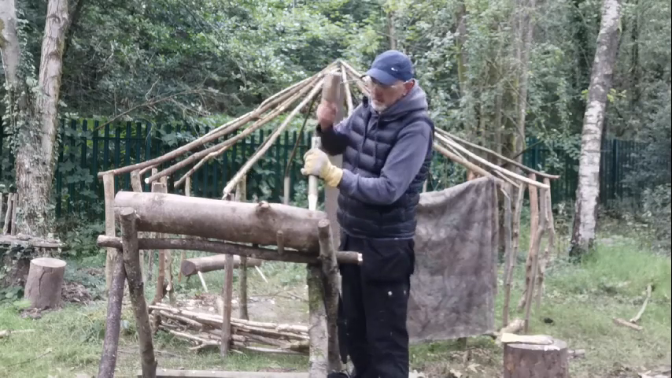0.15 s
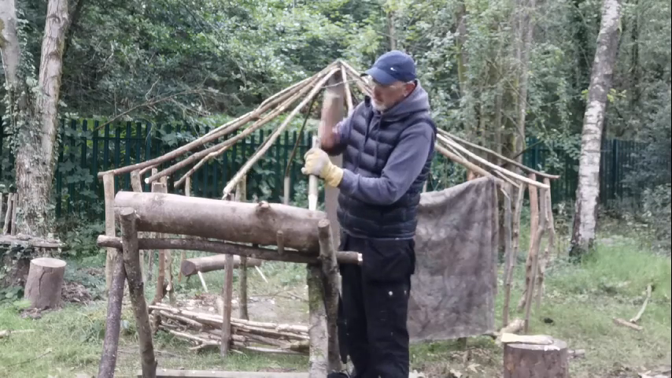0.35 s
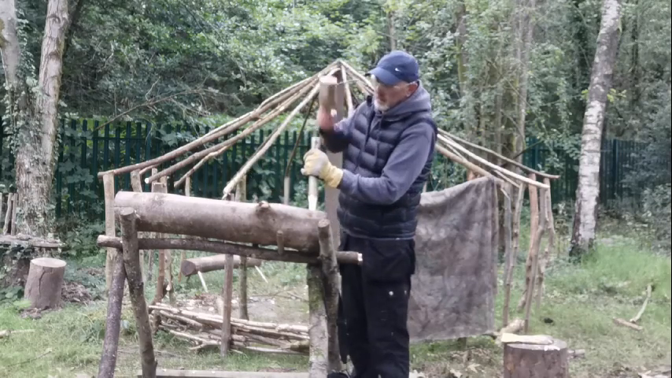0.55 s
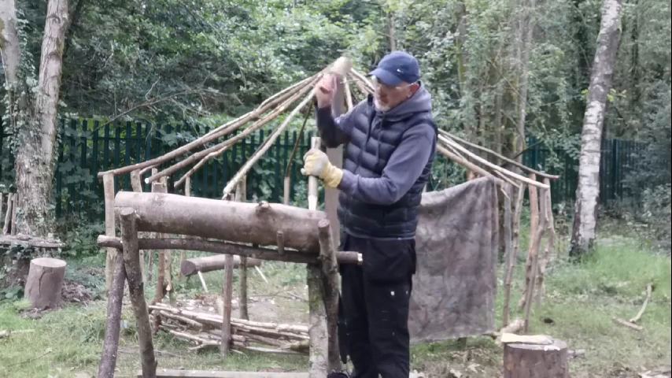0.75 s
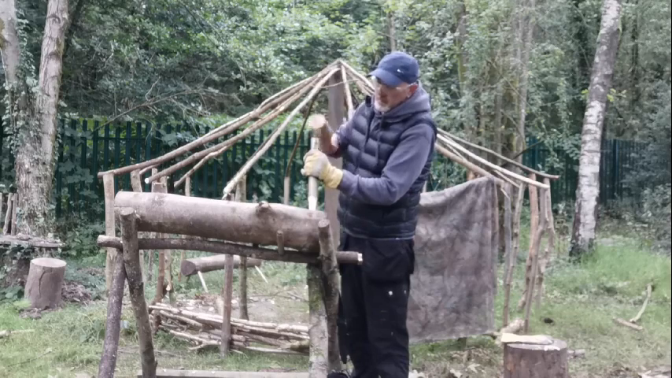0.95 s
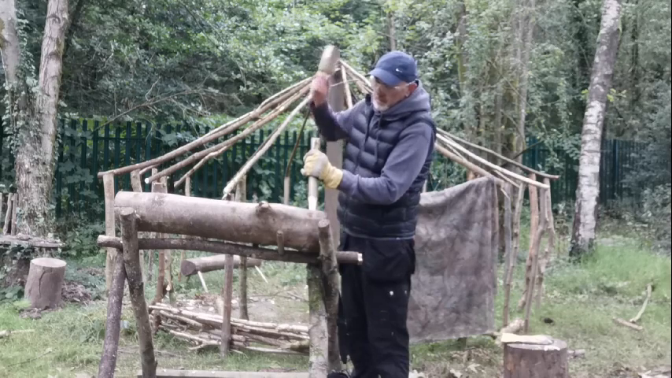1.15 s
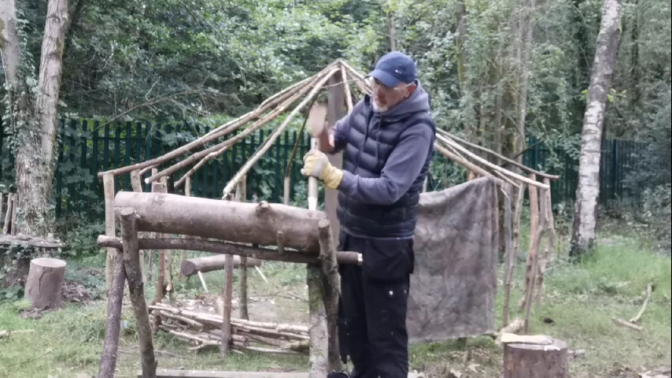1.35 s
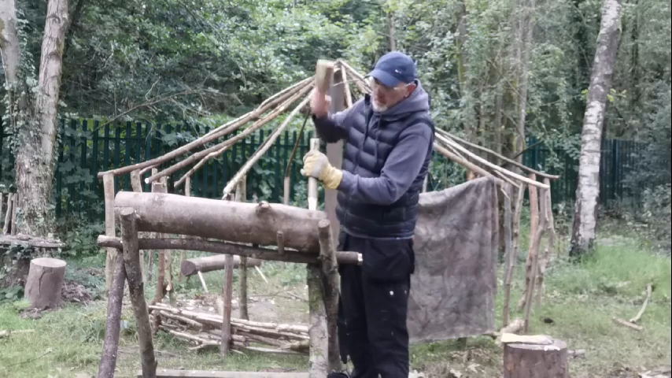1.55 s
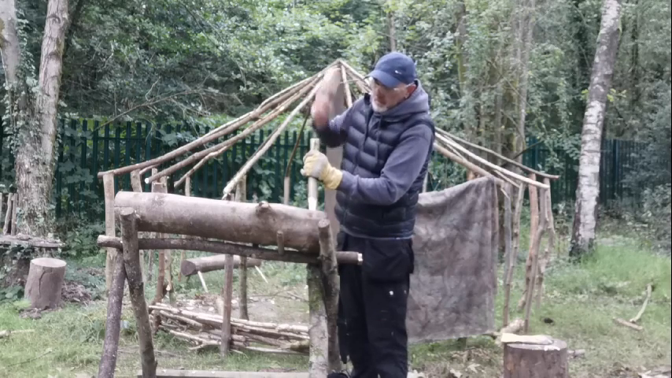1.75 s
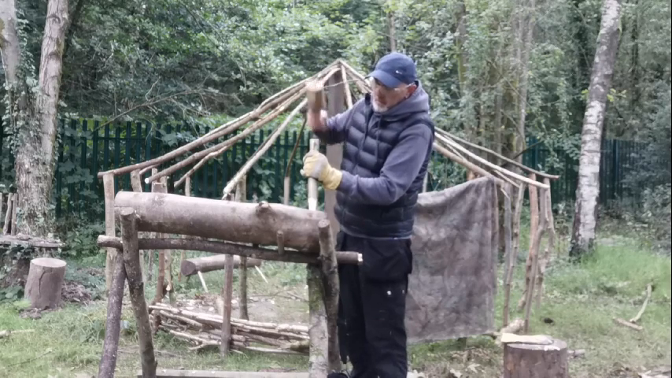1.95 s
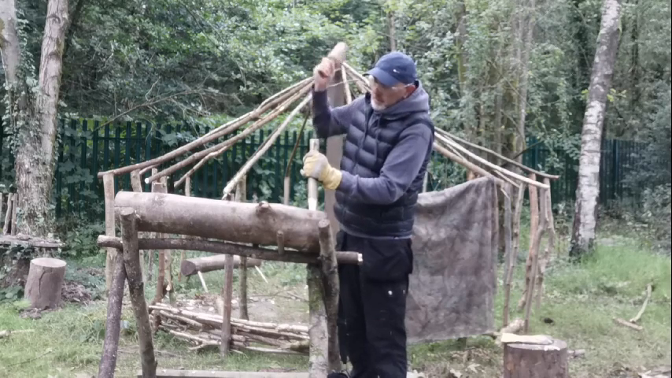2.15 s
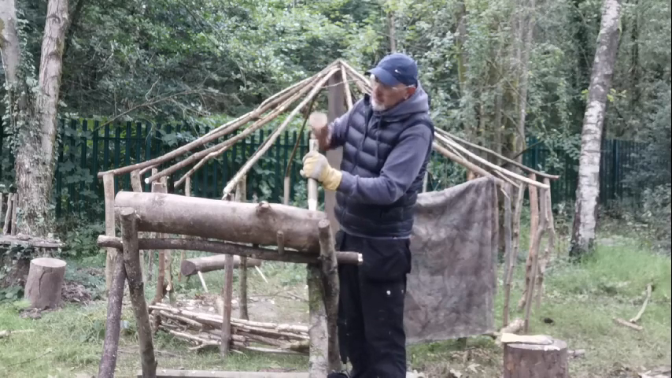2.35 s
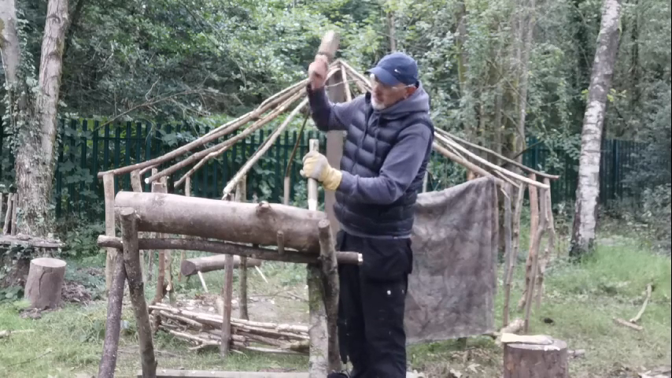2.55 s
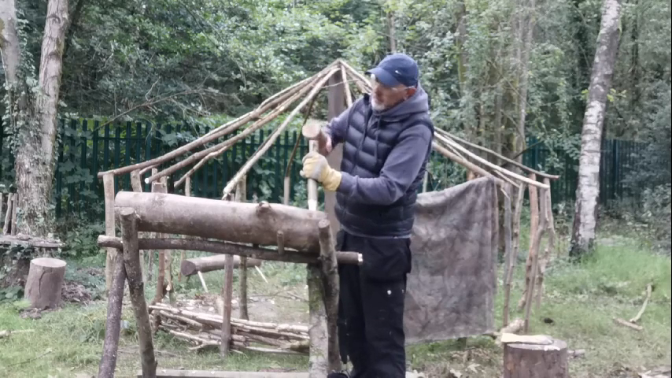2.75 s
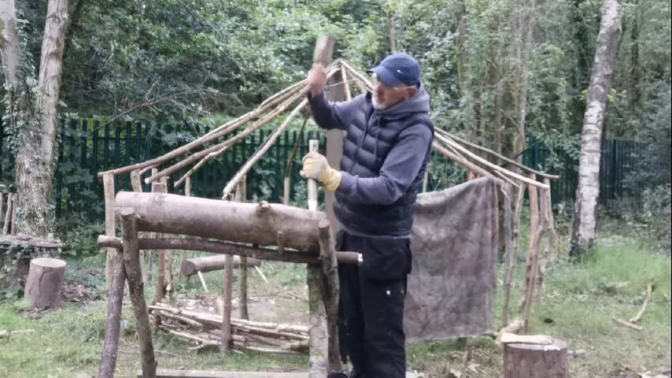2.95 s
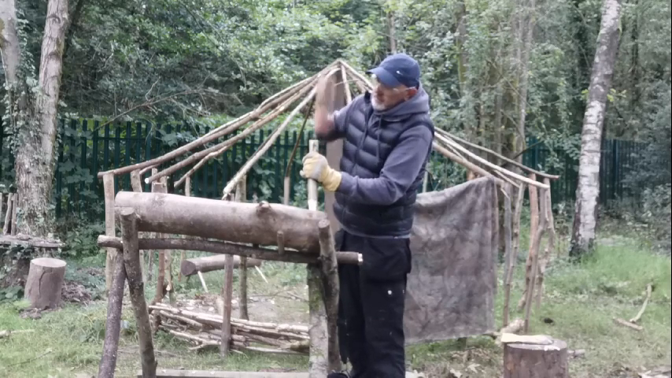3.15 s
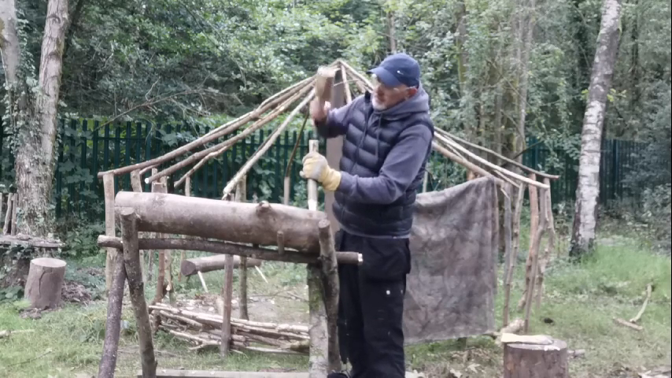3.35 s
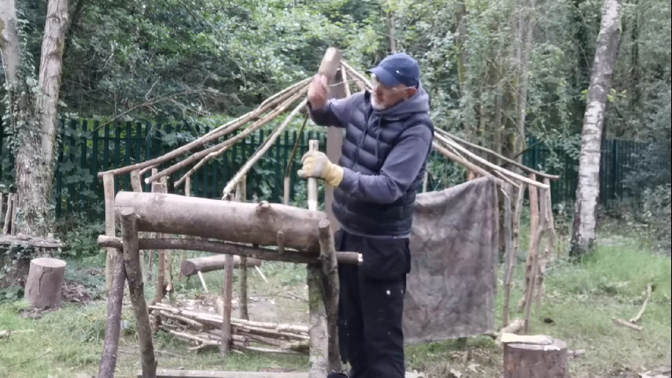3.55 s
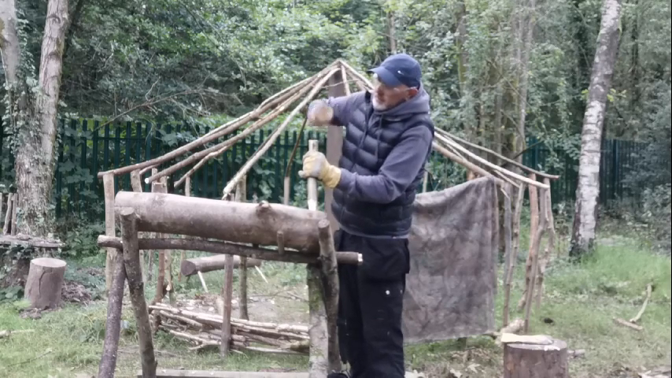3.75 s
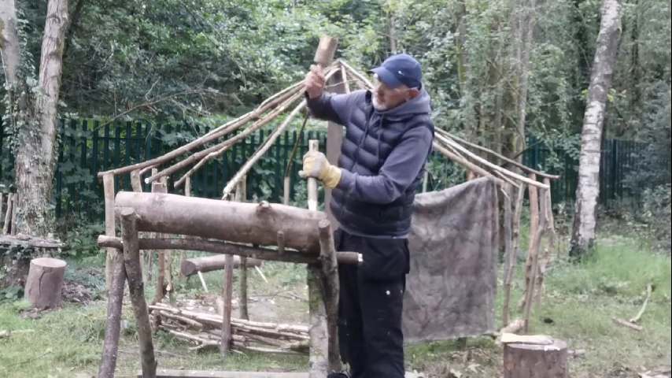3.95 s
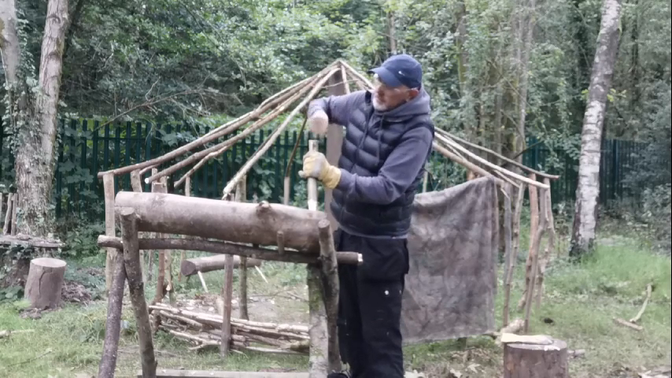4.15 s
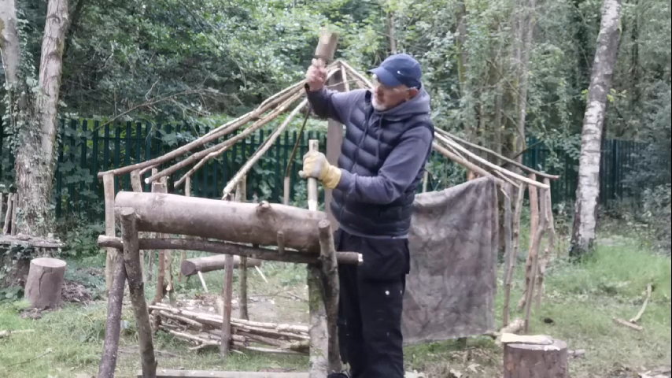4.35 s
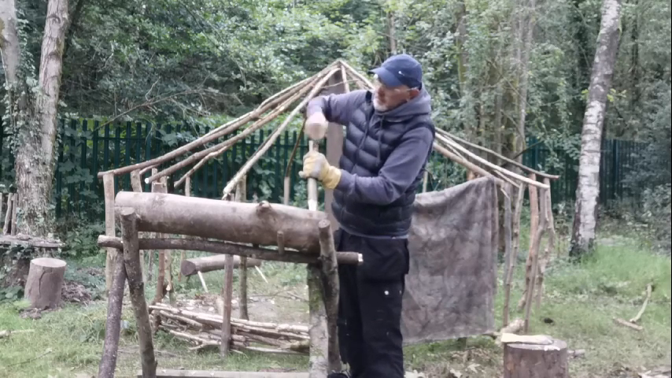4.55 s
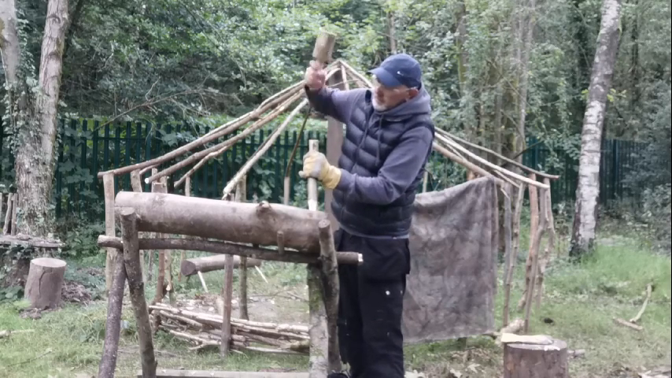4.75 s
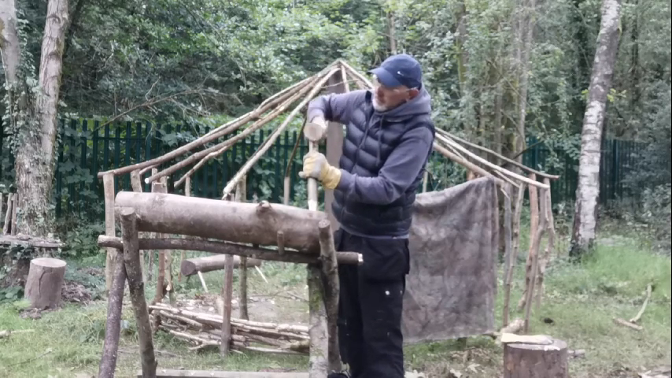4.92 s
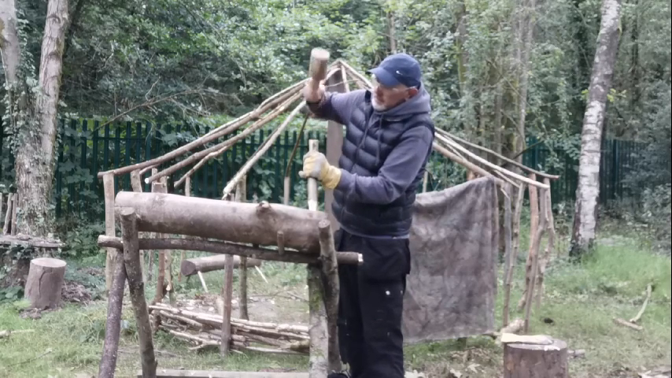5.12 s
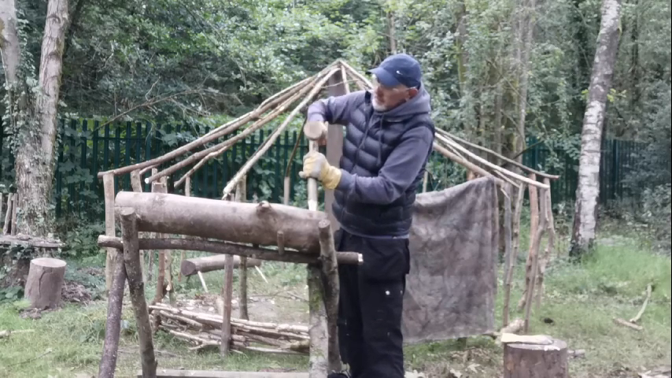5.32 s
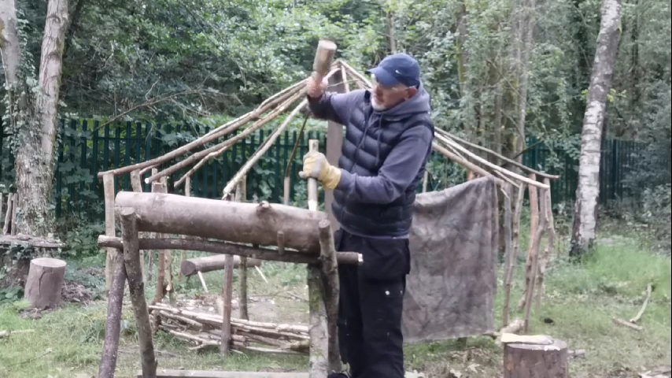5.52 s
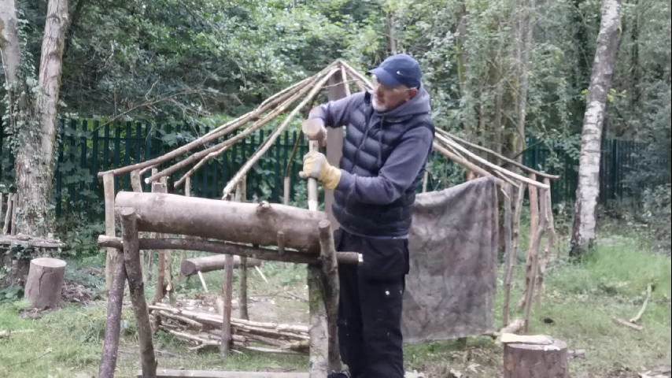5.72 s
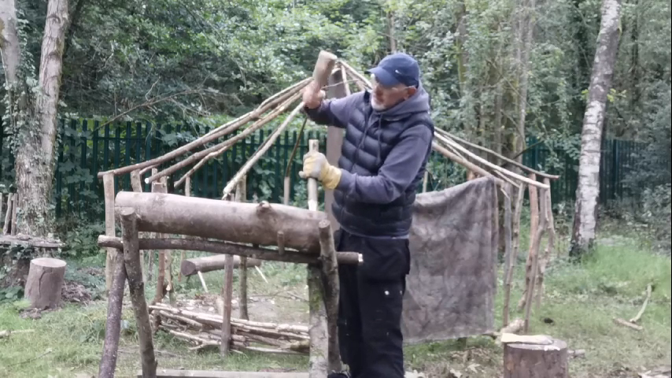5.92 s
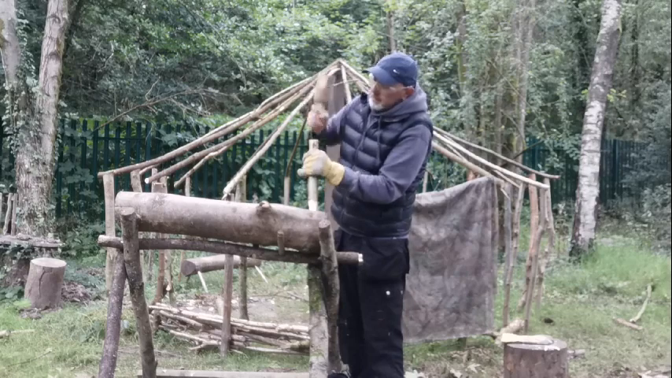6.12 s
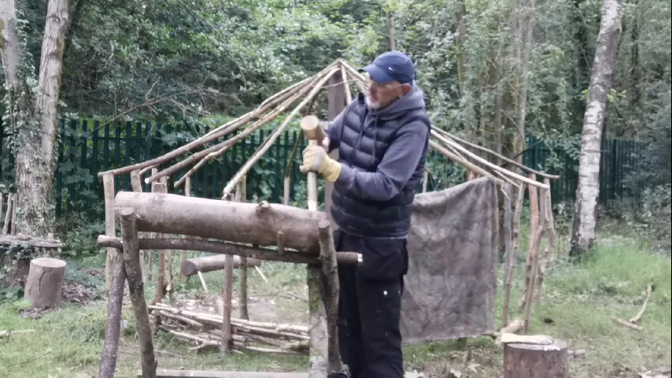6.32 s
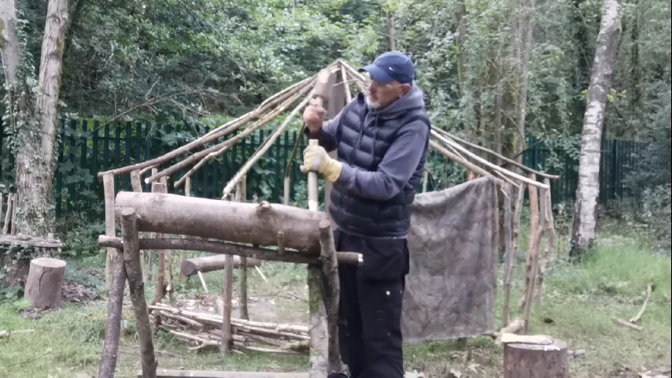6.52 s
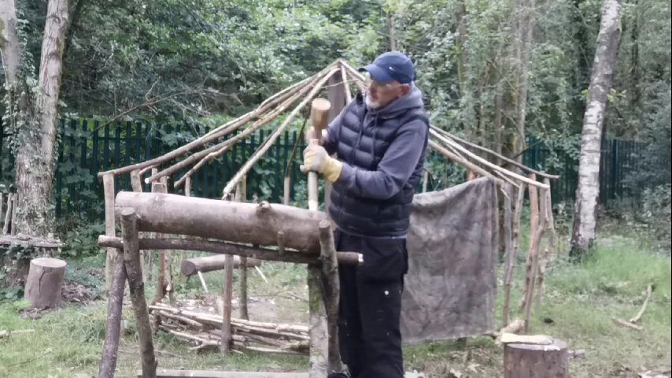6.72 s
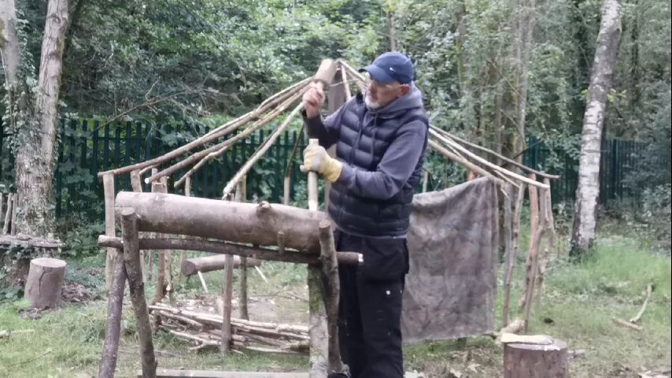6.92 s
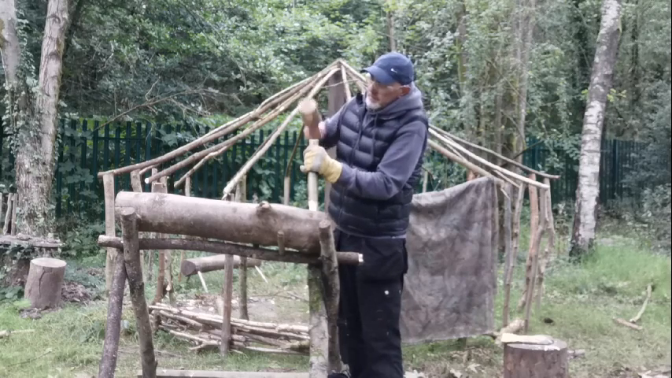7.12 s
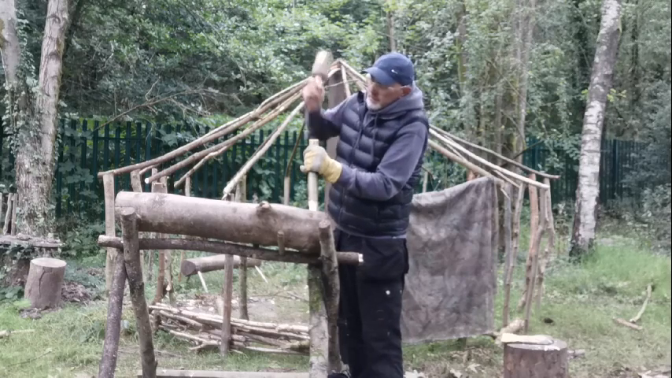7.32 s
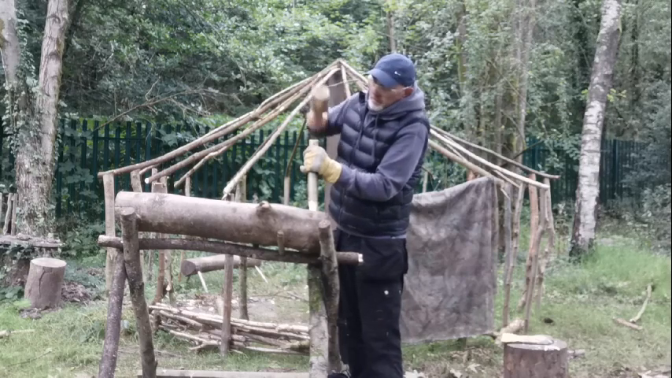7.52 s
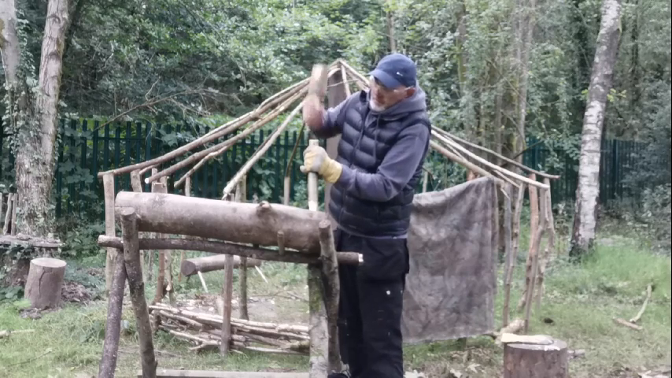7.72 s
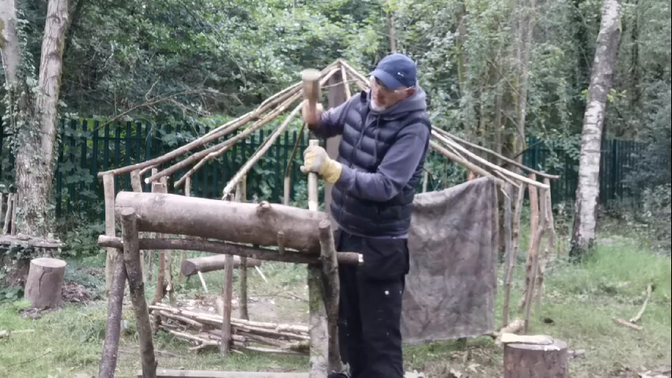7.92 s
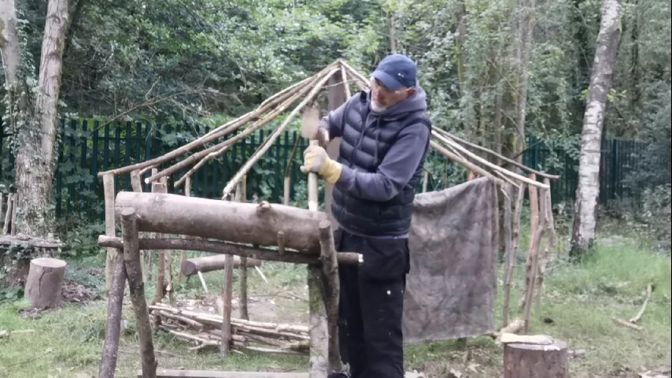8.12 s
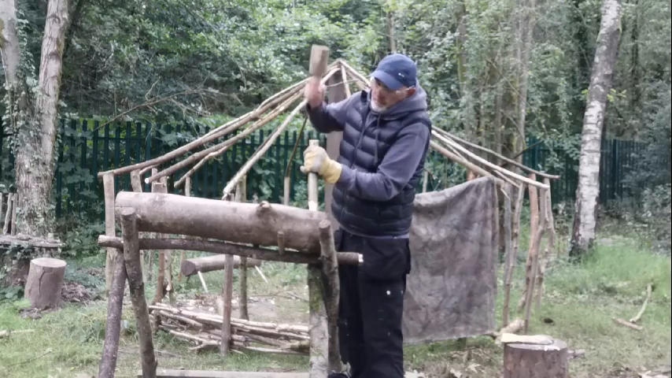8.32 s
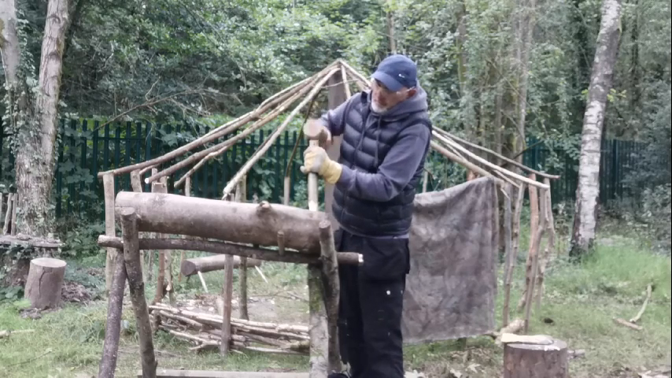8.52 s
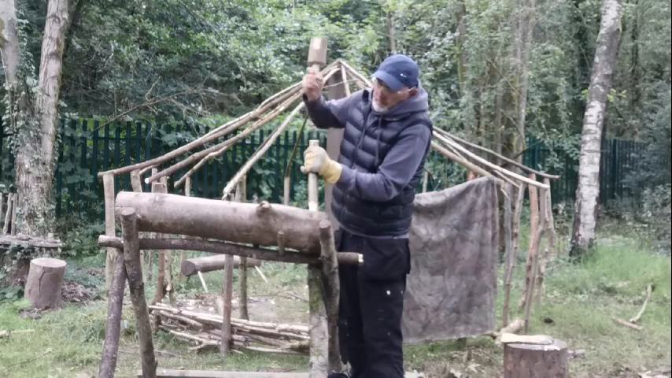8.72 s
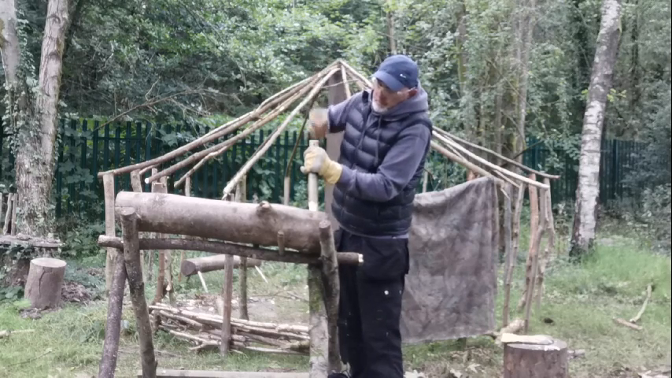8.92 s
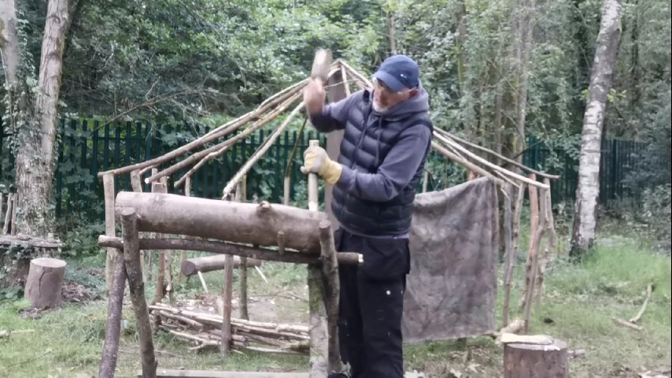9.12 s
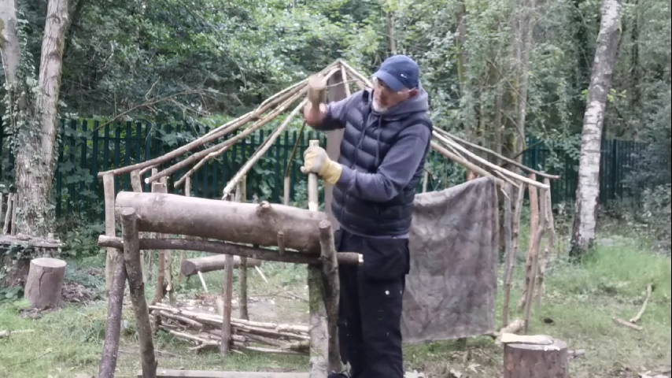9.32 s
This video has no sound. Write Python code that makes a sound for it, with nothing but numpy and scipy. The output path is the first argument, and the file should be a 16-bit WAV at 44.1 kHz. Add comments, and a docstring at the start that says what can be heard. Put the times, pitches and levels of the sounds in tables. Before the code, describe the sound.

A quiet woodland clearing, with very soft leaf hiss and a faint low rumble. At about 0.5 s a wooden mallet hits a peg set in a log: a short, hard crack with a hollow knock just behind it. A tiny far hoot, around 0.7 to 0.9 s, is barely audible. Knocks continue nearly every 0.45 s, from 1.0 s to 3.3 s strong and crisp with some woody grit. From 3.8 to 5.8 s they come about every 0.4 s, generally weaker, some thin and scraping; a faint far echo follows the 3.8 s blow at 4.1 s. An almost inaudible tap at 6.4 s leaves a gap, then a lighter knock at 6.8 s. Firm, fuller blows resume from 7.2 s, about every 0.36 s, until 9.3 s. Each leaves a short slap and a diffuse, fading tail among the trees; the leaves gradually become quieter.

```python
"""In a woodland clearing a wooden mallet drives a peg into a log on trestles. Each blow sums decaying wood modes
and grinding noise into a crack; 2.58 ms later the peg jams, and the log rings and thuds. Trunks scatter each blow
as decaying noise; a fence and far walls return discrete echoes, and a noise burst strengthens the far echo of the
bright blow at 3.78 s. A far hoot is two sine partials. Behind them, coloured noise gives a low rumble, which dips
after some blows, and the hiss of leaves."""
import sys
import numpy as np
from scipy import signal
from scipy.fft import rfft, irfft, next_fast_len
from scipy.io import wavfile
from scipy.ndimage import uniform_filter1d, map_coordinates

SR = 44100
rng = np.random.default_rng(int(sys.argv[2]) if len(sys.argv) > 2 else 0)


def gain_from_db(level_db):
    """Turn a decibel level (scalar or array-like) into a linear amplitude factor."""
    decades = np.asarray(level_db, float) / 20
    return 10 ** decades


def master(y):
    """Save y as 16-bit WAV."""
    cut = np.clip(np.atleast_2d(y).T, -1, 1)
    pcm = np.round(cut * 32767)  # scale
    wavfile.write(sys.argv[1], SR, pcm.astype(np.int16))


N = 417627


def unit(x):
    """Normalisation: scales a signal to an rms of one."""
    return x / np.sqrt(np.mean(x ** 2) + 1e-20)


def along(points, hz):
    """Logarithmic pitch scale: interpolates (frequency [Hz], value) points along log frequency."""
    f, v = np.transpose(points)
    return np.interp(np.log(hz + 1), np.log(f + 1), v)


def curve(rows):
    """Linear envelope: one value per sample for each column after the time."""
    s, *cols = np.transpose(rows)
    return [np.interp(np.arange(N) / SR, s, c) for c in cols]


def wobble(rate):
    """Slow random modulation: a smooth spline through `rate` random knots a second."""
    knots = rng.standard_normal(int(N * rate / SR) + 4)
    return map_coordinates(knots, [np.arange(N) * rate / SR])


def filtered(x, response):
    """Linear filtering: multiplies the spectrum of x by a response of frequency."""
    m = next_fast_len(x.shape[-1] + 4096)
    spectrum = rfft(x, m) * response(np.fft.rfftfreq(m, 1 / SR))
    return irfft(spectrum, m)[..., :x.shape[-1]]


# left-right likeness of diffuse sound: (frequency [Hz], correlation [-1 to 1])
LIKENESS = [(60, 0.5), (130, 0.94), (290, 0.83), (640, 0.24), (1410, -0.23), (3100, 0.02), (6820, 0.02),
            (15000, -0.01)]


def diffuse(pair, spectrum):
    """Diffuse-field coherence: colours two unrelated signals and mixes them as two close microphones hear them."""
    def response(hz):
        turn = np.arccos(np.clip(along(LIKENESS, hz), -1, 1)) / 2
        return gain_from_db(along(spectrum, hz)) * [np.cos(turn), np.sin(turn)]
    mid, side = filtered(pair, response)
    return np.array([mid + side, mid - side])


def ring(modes, t, apart, spread_db=2):
    """Modal decay: damped sines at new random strengths; `apart` [rad/kHz] scales their left-right phase."""
    hz, db, t60 = np.transpose(modes)[:, :, None]
    level, lag = rng.standard_normal((2, len(modes), 1))
    decay = gain_from_db(db + spread_db * level - 60 * np.abs(t) / t60) * (t > 0)
    phase, shift = 2 * np.pi * hz * t, apart * lag * hz / 1000
    return np.array([np.sum(decay * np.sin(phase + side * shift), 0) for side in (1, -1)])


# modes of mallet head and peg: (frequency [Hz], relative level [dB], t60 [s])
MALLET_MODES = [(1484, -3.5, 0.031), (1904, -2, .018), (2230, 3, 0.0098), (2637, -9, 0.025),
                (3115, -2.5, 0.013), (3740, -11, .008), (4510, -13.5, 0.019), (6720, -16.5, 0.0074)]


def crack(t, crack_db, crack_hz):
    """Impact excitation of modes: head and peg ring, with one added mode whose pitch changes by blow."""
    onset = 1 - np.exp(-(t / 0.001) ** 2)
    modes = MALLET_MODES + [(crack_hz, 3, 0.016)]
    return gain_from_db(crack_db) * onset * ring(modes, t, apart=0.045)


# colour of the grinding faces: (frequency [Hz], relative level [dB])
GRIT_COLOUR = [(150, -30), (600, -13.5), (1500, -0.5), (3000, 1.5), (4500, 0.5), (6800, -3.5), (8300, -10),
               (9400, -8.5), (12000, -19), (16000, -39.5)]


def face_grit(t, grit_db):
    """Contact friction: noise bursts while the faces touch, with a weak decaying remainder."""
    contact = np.exp(-(t / 0.0011) ** 2) + gain_from_db(-20.5 - 60 * t / 0.046)
    contact = (1 - np.exp(-t / 0.0002)) * contact
    noise = rng.standard_normal((3, len(t))) * contact
    # one noise shared by both sides, one of its own for each
    return gain_from_db(grit_db) * filtered(noise[0] + 0.89 * noise[1:], lambda hz: gain_from_db(along(GRIT_COLOUR, hz)))


# modes of the log on its trestles: (frequency [Hz], relative level [dB], t60 [s])
LOG_MODES = [(573.5, -7, 0.074), (604, -29.5, 0.59), (725, 1.5, 0.026), (814, 3, 0.015), (935, -4, 0.033),
             (1050, -4, 0.044), (1151, -20.5, 0.012)]


def log_ring(t, late, s, log_db):
    """Forced modal response: the log rings faintly at first contact, then fully, opposite in sign, at the jam."""
    darkens_db_per_octave_s, pivot_hz = 1.54, 720  # the ring leans to its low modes as the peg goes deeper
    tilt = darkens_db_per_octave_s * (s - N / SR / 2)
    seated = [(hz, db - tilt * np.log2(hz / pivot_hz), t60) for hz, db, t60 in LOG_MODES]
    first = gain_from_db(-13.5) * ring(seated, t - 0.0006, apart=0.3)
    onset = 1 - np.exp(-np.abs(late) / 0.00028)
    return gain_from_db(log_db) * (onset * ring(seated, late, apart=0.3) - first)


def thud(late, s, log_db, grit_db):
    """Rigid-body momentum transfer: a soft shove of the whole log and two low modes of sway."""
    u = (late - 0.001) / 0.001
    push = (u * u - 1) * np.exp(-u * u / 2)
    sway = ring([(256, -10, 0.033), (387, 1.5, 0.031)], late - 0.0012, apart=0.15)
    # steeper in dB than the ring, weaker when the faces glance and grind, stronger as the peg seats
    base_db, per_ring_db, lost_per_grit_db, seating_db_per_s = -22.5, 1.28, 1.56, 3
    thud_db = base_db + per_ring_db * log_db - lost_per_grit_db * (grit_db - log_db) + seating_db_per_s * s
    return gain_from_db(thud_db) * (1.2 * push + 0.92 * sway)


def blow(s, crack_db, log_db, grit_db, crack_hz):
    """Two-stage impact: wood cracks on wood, then the peg jams and the log takes the push."""
    t = np.arange(SR // 2) / SR
    late = t - 0.00258  # time since the jam [s]
    hit = crack(t, crack_db, crack_hz)
    hit[:, :4096] += face_grit(t[:4096], grit_db)
    hit = hit + log_ring(t, late, s, log_db) + thud(late, s, log_db, grit_db)
    # a small body sends out no deep bass
    return filtered(hit, lambda hz: (1j * hz / (1j * hz + 120)) ** 2)


def all_round(hit):
    """Directional averaging: a short pulse with the blow's broad colour, its spectral notches filled in."""
    hz = np.fft.rfftfreq(4096, 1 / SR)
    steps = np.geomspace(50, SR / 2, 400)
    power = np.interp(steps, hz, np.abs(rfft(hit[:4096])) ** 2)
    power = np.where(steps < 3500, uniform_filter1d(power, size=15), uniform_filter1d(power, size=27))
    magnitude = np.sqrt(np.abs(np.interp(hz, steps, power)))
    return np.roll(irfft(magnitude), 256)[:512]


# colour of the woodland scatter: (frequency [Hz], relative level [dB])
WOODS_COLOUR = [(200, -27), (400, -19.5), (540, -22), (606, -8.5), (680, -23.5), (900, -17), (1400, -17),
                (1700, -11), (1840, -7.5), (2000, -15), (2500, -12.5), (3000, -15), (4300, -8.5),
                (6000, -11.5), (12000, -9)]
# decay of the woodland scatter: (frequency [Hz], t60 [s])
WOODS_DECAY = [(300, 0.2), (600, 0.94), (1500, 0.73), (4000, 0.68), (8000, 0.63), (13000, 0.42)]


def trunks(length):
    """Multiple scattering: noise dies at its own speed in each band; the nearest poles give a dense start."""
    hz, t, z = signal.stft(rng.standard_normal((2, length)), SR, nperseg=512)
    decay = gain_from_db(-60 * t / along(WOODS_DECAY, hz)[:, None])
    tail = signal.istft(z * decay, SR, nperseg=512)[1][:, :length]
    t = np.arange(length) / SR
    tail = tail * (1 - np.exp(-(t / 0.0017) ** 2)) * (1 + gain_from_db(5.5 - 60 * t / 0.027))
    return diffuse(tail / np.linalg.norm(tail[0]), WOODS_COLOUR)


# fence and far walls: (delay [s], level [dB], left over right [dB], best-returned frequency [Hz])
REFLECTORS = [(.043, -18.5, 2, 1350), (.147, -31, 4, 2600), (.325, -39, 2, 3000)]


def add_echoes(answer, hit):
    """Specular reflection: delayed copies of the blow, each limited to the band its reflector returns best."""
    for delay, db, pan_db, best_hz in REFLECTORS:
        slap = filtered(hit[:, :2048], lambda hz: np.exp(-(np.log(hz / best_hz + 1e-9) / 0.32) ** 2))
        slap[1] = np.roll(slap[1], 8)  # from the side, it reaches the far microphone 8 samples later
        gain = gain_from_db(db + np.array([[pan_db], [-pan_db]]) / 2)
        answer[:, round(delay * SR):][:, :slap.shape[1]] += slap * gain


# level balance of the direct sound: (frequency [Hz], left over right [dB])
DIRECT_BALANCE = [(60, -2), (110, -1), (200, 3), (380, 0.5), (700, 0.5), (1290, 1.0), (2380, 3),
                  (4400, 1.5), (8120, -3.5), (15000, -5)]
# blows: (time [s], crack level [dB], log ring level [dB], face grit level [dB], crack pitch [Hz])
MALLET_BLOWS = [(0.5265, -17.5, -12.5, -19.5, 2050), (1.0082, -13.5, -11, -14.5, 1540),
                (1.4997, -12.5, -12, -8, 2230), (1.946, -12.5, -12, -13.5, 3120),
                (2.4159, -10, -12, -12, 2023), (2.8608, -10, -13.5, -10, 2105),
                (3.3285, -12, -16.5, -10, 2490), (3.7823, -23, -19.5, -11, 3114),
                (4.2107, -15.5, -17.5, -9.5, 2330), (4.6328, -24.5, -21, -10, 3260),
                (5.0457, -16, -18, -8.5, 2980), (5.441, -18, -15.5, -15.5, 2300),
                (5.8452, -18.5, -16, -12.5, 1440), (6.4353, -47, -47.5, -63, 1850),
                (6.7877, -23, -16.5, -21, 2516), (7.1686, -12, -17.5, -13, 2324),
                (7.5476, -10, -17, -11.5, 1630), (7.9113, -14, -17.5, -15, 1564),
                (8.2654, -11.5, -17, -13, 1570), (8.624, -10.5, -15.5, -10.5, 1627),
                (8.98, -9.5, -15.5, -12, 2140), (9.3327, -10.5, -16.5, -11, 2077)]


def mallet():
    """Superposition: direct blow, scatter and echoes add; the trees stand still, so part of the scatter repeats."""
    same = 0.67  # amplitude share of the repeating scatter
    length = int(0.7 * SR)
    out, standing = np.zeros((2, N + 2 * SR)), trunks(length)
    for s, crack_db, log_db, grit_db, crack_hz in MALLET_BLOWS:
        hit = blow(s, crack_db, log_db, grit_db, crack_hz)
        woods = same * standing + np.sqrt(1 - same ** 2) * trunks(length)
        # sharp square blows carry sideways, dull ones stay in the log
        carry = gain_from_db(0.35 * (grit_db - crack_db) - 0.26 * (log_db - crack_db))
        answer = carry * signal.fftconvolve(all_round(hit.mean(0))[None], woods, axes=1)
        add_echoes(answer, hit)
        direct = filtered(hit, lambda hz: gain_from_db(along(DIRECT_BALANCE, hz) * np.array([[0.5], [-0.5]])))
        answer[:, :hit.shape[1]] += direct
        out[:, round(s * SR):][:, :answer.shape[1]] += answer
    return out[:, :N]


# colour of the stronger far echo: (frequency [Hz], relative level [dB])
ECHO_COLOUR = [(300, -19), (1000, -17), (3000, -0.5), (6000, -4.5), (12000, -24.5)]
# the stronger far echo of the bright blow at 3.78 s: (time [s], starting level before colouring [dB])
STRAY_ECHO = [(4.1045, -43)]


def stray_echo():
    """Exponential decay: the stronger far echo of one bright blow, made as a coloured noise burst."""
    out, t = np.zeros((2, N)), np.arange(SR // 20) / SR
    for s, db in STRAY_ECHO:
        burst = gain_from_db(db - 60 * t / 0.065) * rng.standard_normal((2, len(t)))
        out[:, round(s * SR):][:, :len(t)] += burst
    return filtered(out, lambda hz: gain_from_db(along(ECHO_COLOUR, hz)))


def hoot():
    """Harmonic tone: a soft far note with a weak octave, swelling quickly and fading, its pitch wavering."""
    start_s, rise_s, length_s, release_s = 0.67, 0.031, 0.25, 0.03
    pitch_hz, level_db, fade_db_per_s = 546, -55, 59
    t = np.arange(N) / SR - start_s
    gate = np.clip(t / rise_s, 0, 1) * np.clip((length_s - t) / release_s, 0, 1)
    phase = 2 * np.pi * np.cumsum(pitch_hz + 3 * wobble(12.3)) / SR
    fade_db = level_db - fade_db_per_s * np.clip(t, 0, 1) + 2.0 * wobble(34.3)
    return np.sqrt(2) * gate * gain_from_db(fade_db) * (np.sin(phase) + 0.26 * np.sin(2 * phase))


# colour of the low background rumble: (frequency [Hz], relative level [dB per Hz])
RUMBLE_COLOUR = [(15, -52), (30, -8), (70, -11), (110, -1.5), (155, 2.5), (190, -5), (250, -14),
                 (380, -17.5), (600, -41)]
# level of the low background rumble, which dips after some blows, before its wobble: (time [s], level [dB])
RUMBLE_LEVEL = [(0.0, -58.5), (1.34, -57), (1.55, -66), (2.27, -62.5), (3.98, -74.5), (4.11, -65.5),
                (4.85, -69.5), (4.96, -73), (6.36, -62), (6.83, -65), (9.07, -68.5), (9.47, -67)]


def low_rumble():
    """Random noise spectrum: low coloured noise follows a level that dips after some blows, plus a random wobble."""
    rumble = unit(diffuse(rng.standard_normal((2, N)), RUMBLE_COLOUR))
    level_db, = curve(RUMBLE_LEVEL)
    return gain_from_db(level_db + 2.6 * wobble(2.0)) * rumble


# colour of wind in the leaves: (frequency [Hz], relative level [dB per Hz])
LEAF_COLOUR = [(20, -9), (60, -4), (150, -3.5), (300, -7), (500, -12), (700, -9), (1870, -11.5),
               (2470, -13.5), (3990, -16.5), (6240, -25), (9000, -36.5), (13900, -45), (16500, -52.5)]
# level of the leaves before their random wobble: (time [s], level [dB])
LEAF_COURSE = [(0, -59), (2, -61.5), (4, -63), (6.5, -64), (9.47, -71)]


def leaves():
    """Incoherent summation: wind in many leaves as coloured noise whose level wavers slightly."""
    hiss = unit(diffuse(rng.standard_normal((2, N)), LEAF_COLOUR))
    level_db, = curve(LEAF_COURSE)
    return gain_from_db(level_db + 0.71 * wobble(9)) * hiss


def scene():
    """Superposition: the pressures of all sources add."""
    return mallet() + stray_echo() + hoot() + low_rumble() + leaves()


def low_pass(x):
    """Removes everything above the highest recorded frequency."""
    return signal.sosfilt(signal.butter(12, 16810, fs=SR, output="sos"), x)


def record(dry):
    """Band limitation: a steep low-pass halves the amplitude at 16.3 kHz."""
    mix = filtered(dry, lambda hz: 1 / (1 + (hz / 16300) ** 40))
    return low_pass(mix)


dry = scene()
out = record(dry)
master(out)
```